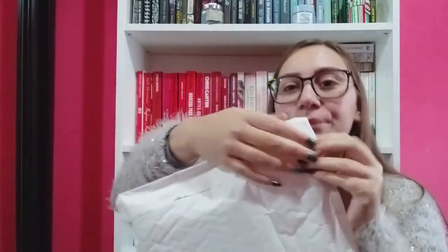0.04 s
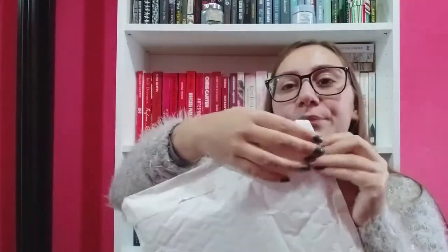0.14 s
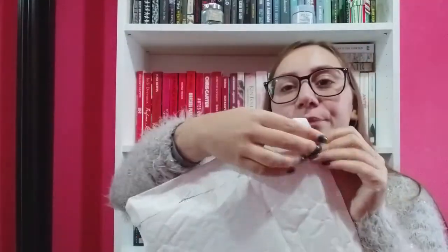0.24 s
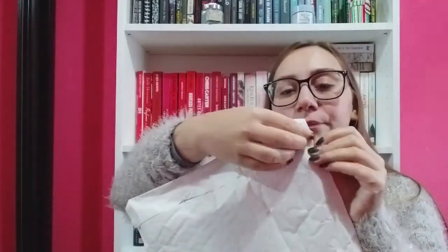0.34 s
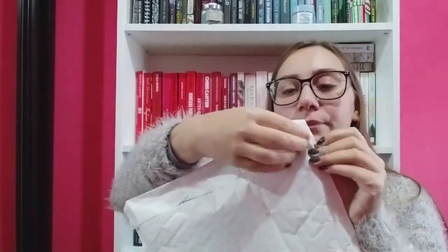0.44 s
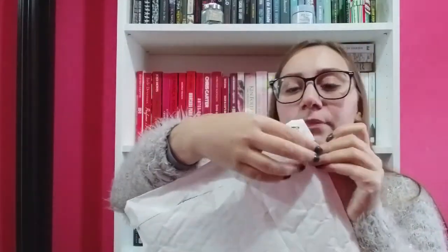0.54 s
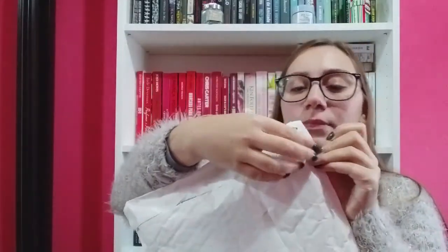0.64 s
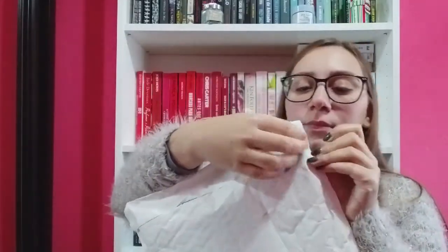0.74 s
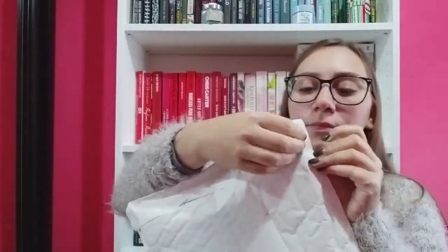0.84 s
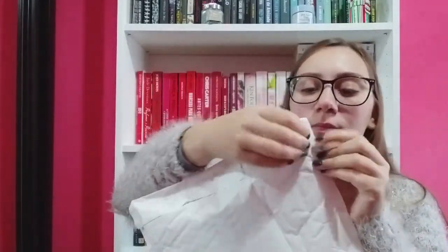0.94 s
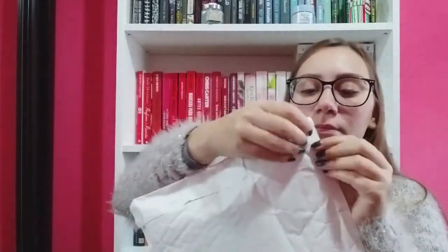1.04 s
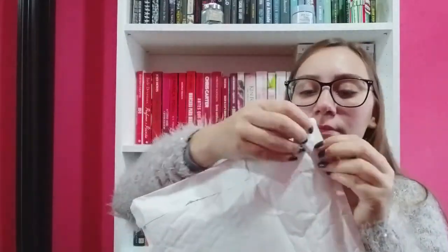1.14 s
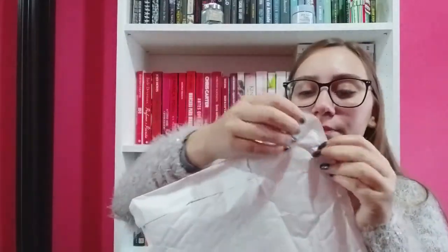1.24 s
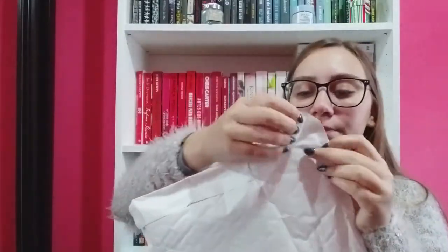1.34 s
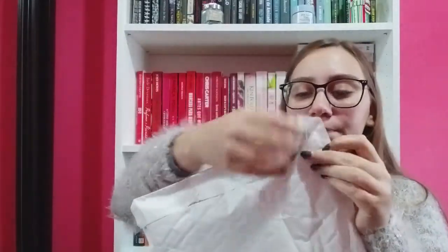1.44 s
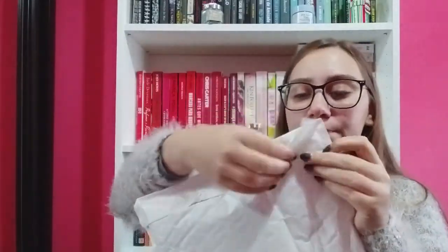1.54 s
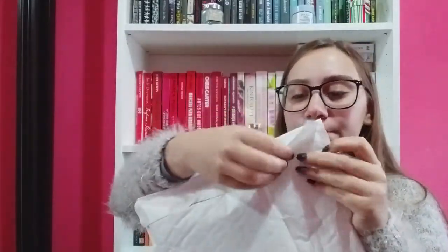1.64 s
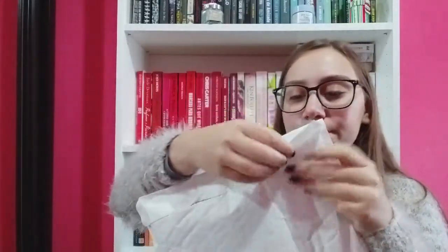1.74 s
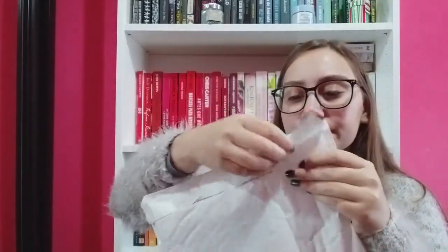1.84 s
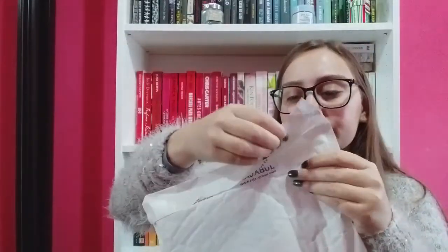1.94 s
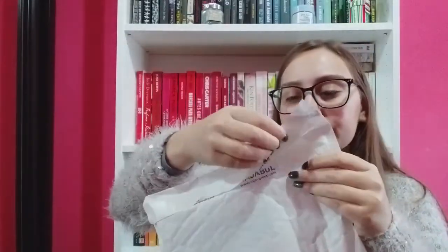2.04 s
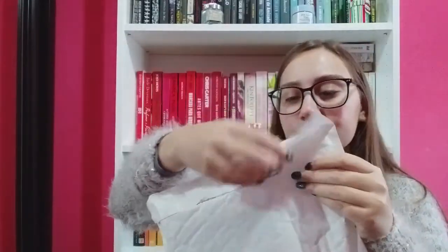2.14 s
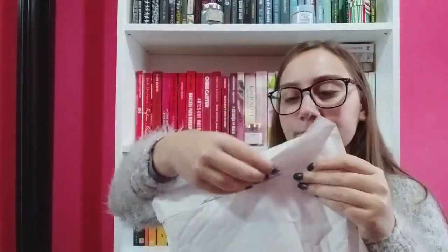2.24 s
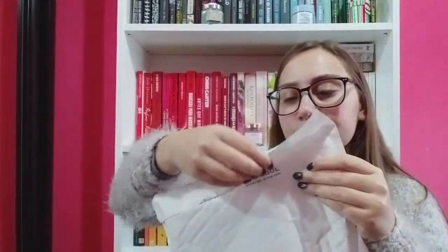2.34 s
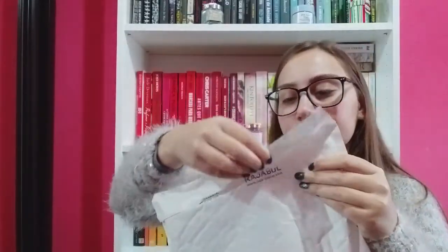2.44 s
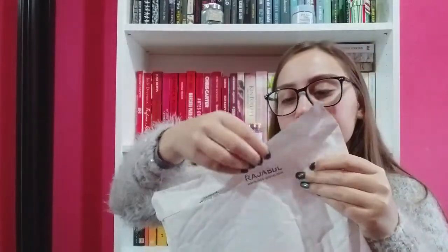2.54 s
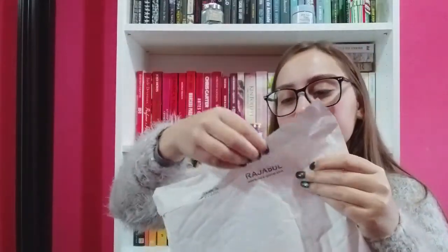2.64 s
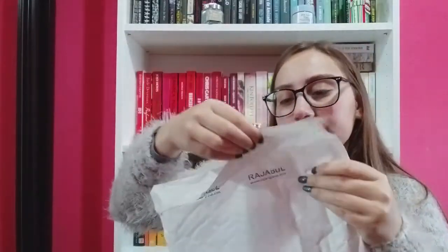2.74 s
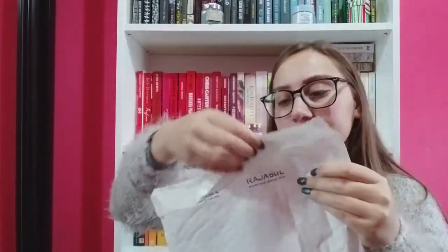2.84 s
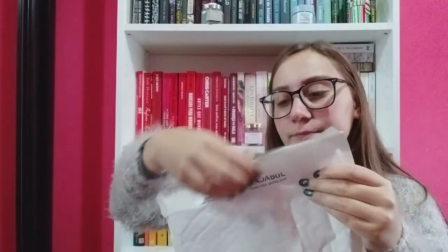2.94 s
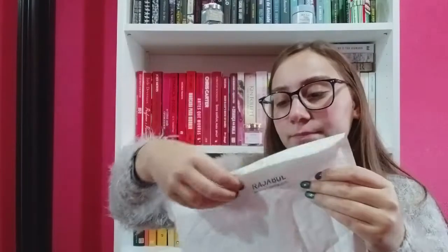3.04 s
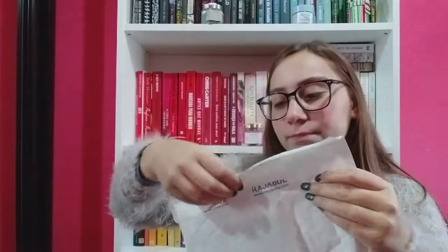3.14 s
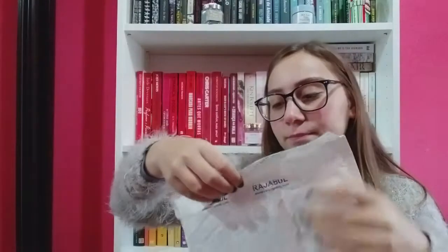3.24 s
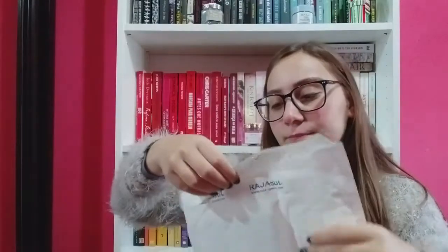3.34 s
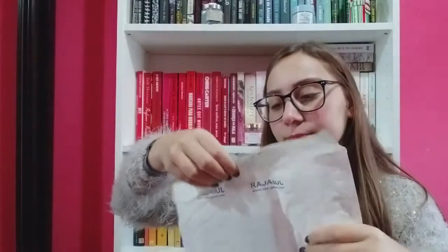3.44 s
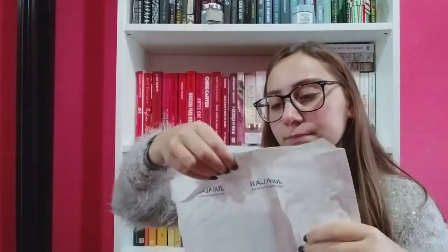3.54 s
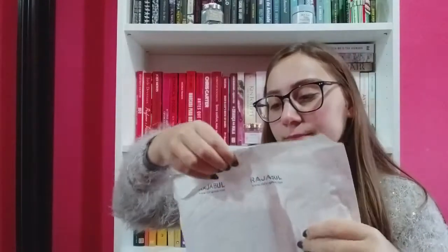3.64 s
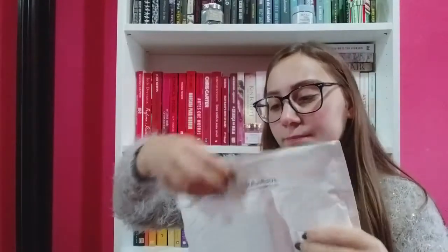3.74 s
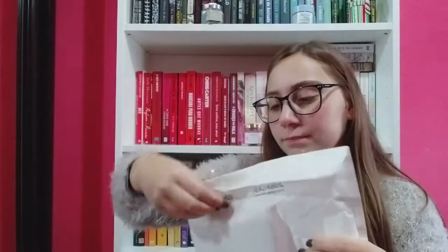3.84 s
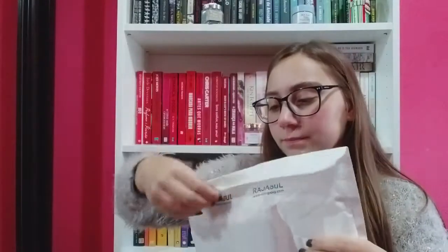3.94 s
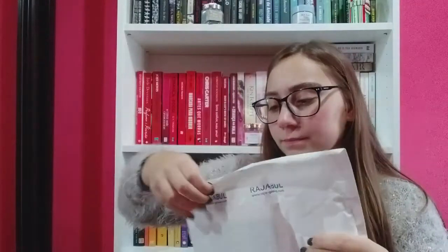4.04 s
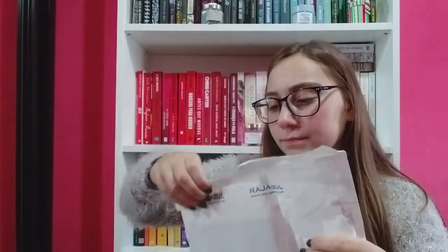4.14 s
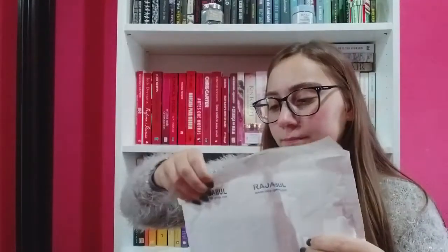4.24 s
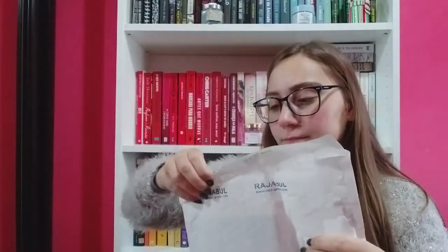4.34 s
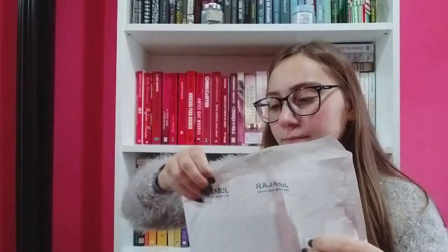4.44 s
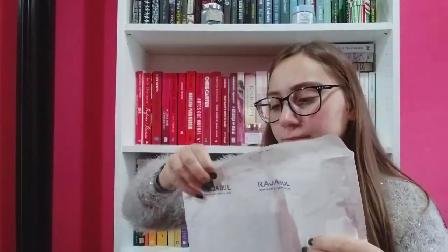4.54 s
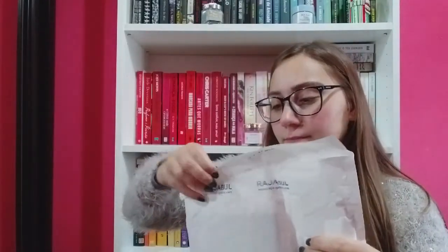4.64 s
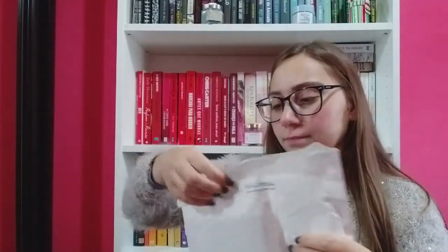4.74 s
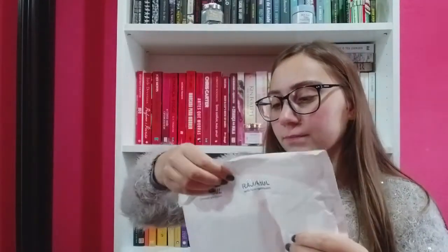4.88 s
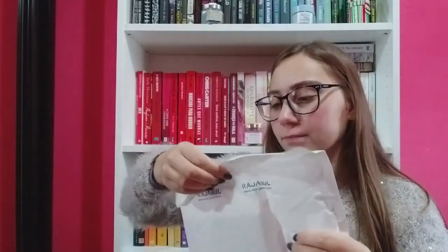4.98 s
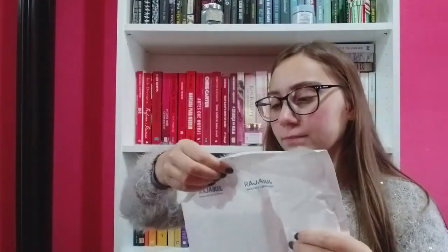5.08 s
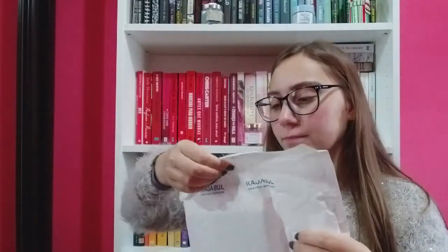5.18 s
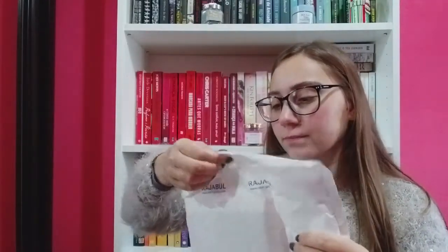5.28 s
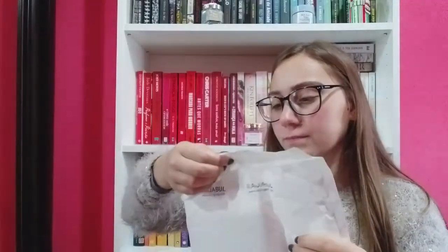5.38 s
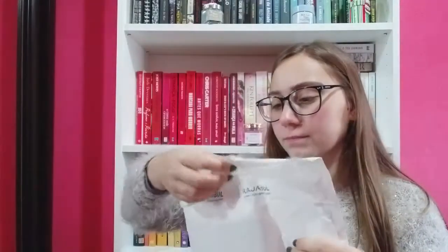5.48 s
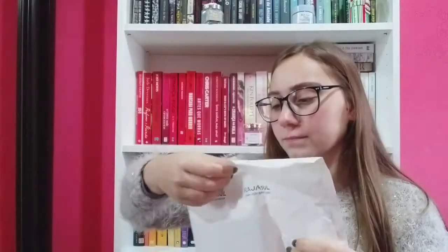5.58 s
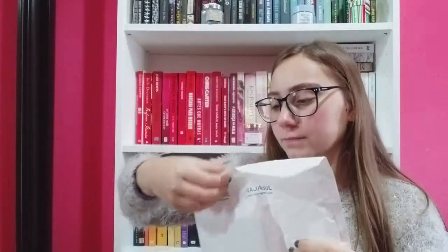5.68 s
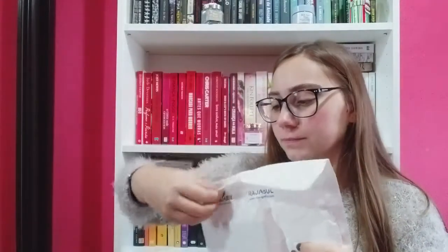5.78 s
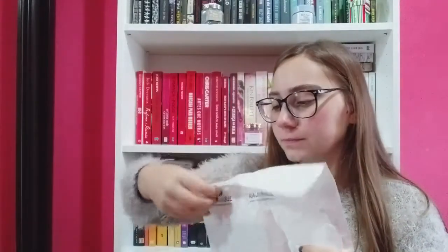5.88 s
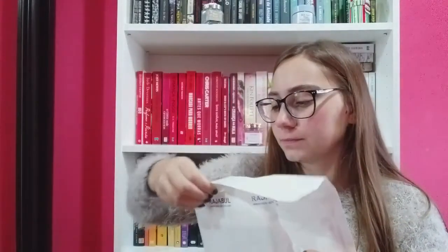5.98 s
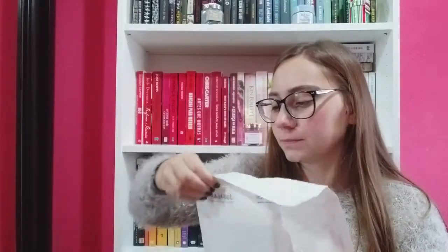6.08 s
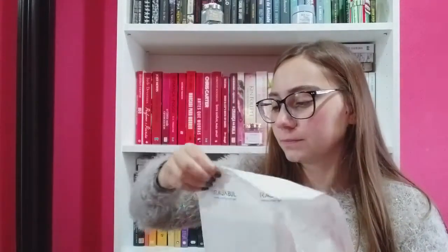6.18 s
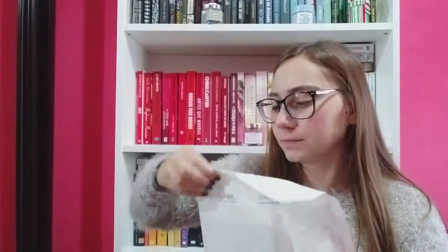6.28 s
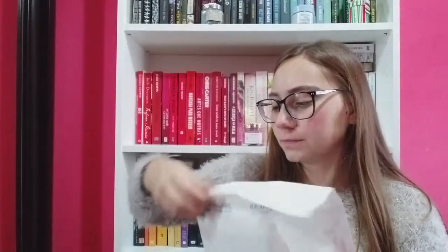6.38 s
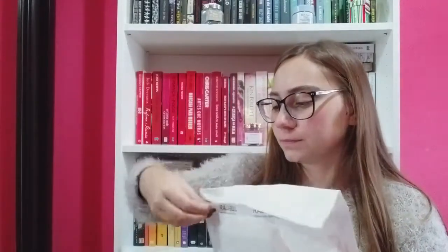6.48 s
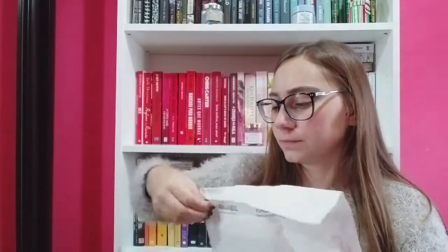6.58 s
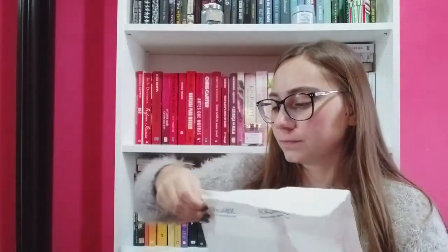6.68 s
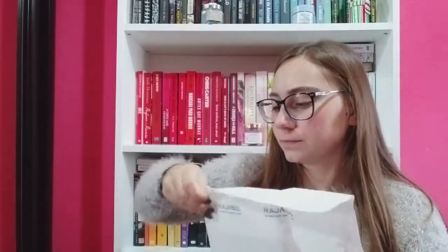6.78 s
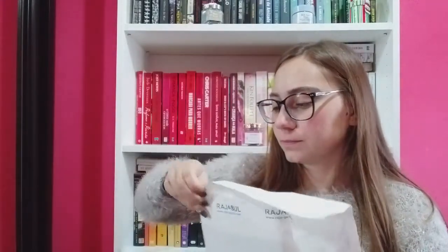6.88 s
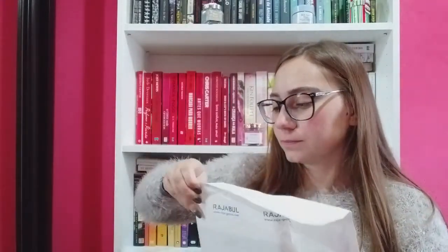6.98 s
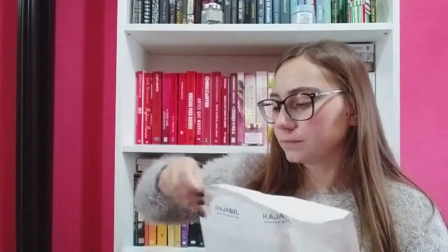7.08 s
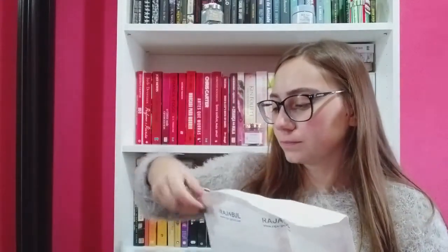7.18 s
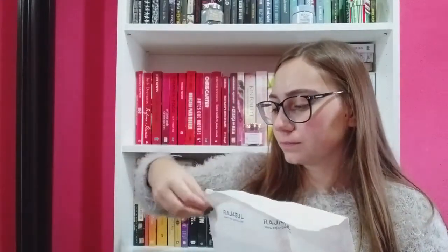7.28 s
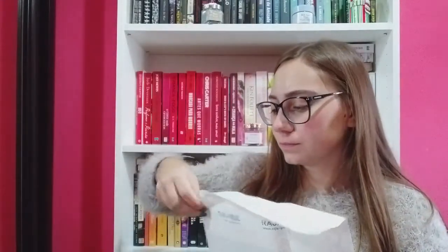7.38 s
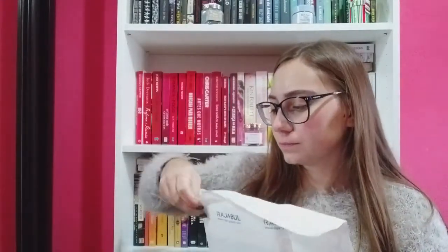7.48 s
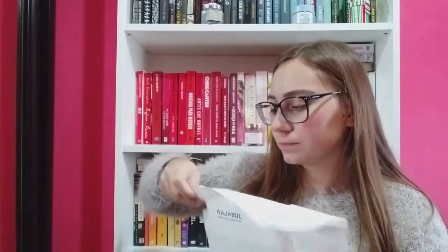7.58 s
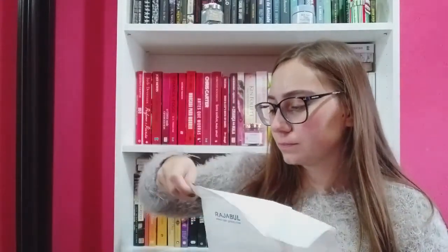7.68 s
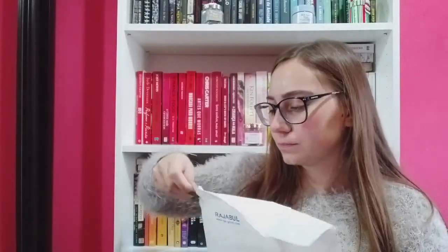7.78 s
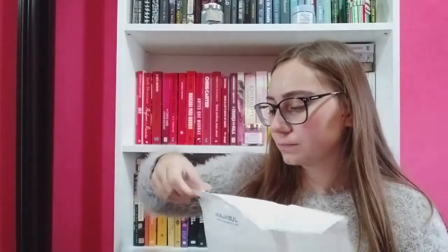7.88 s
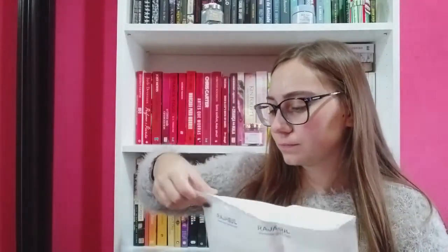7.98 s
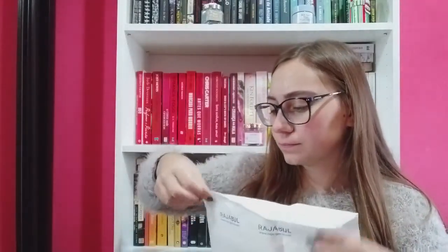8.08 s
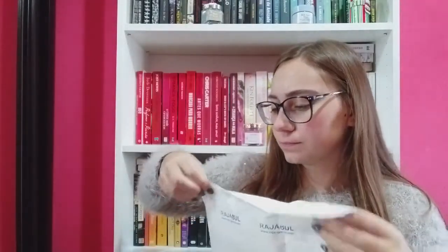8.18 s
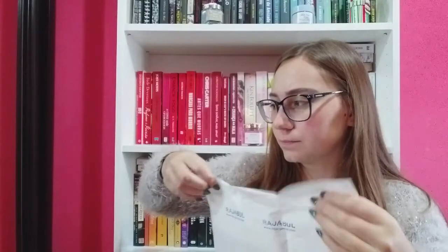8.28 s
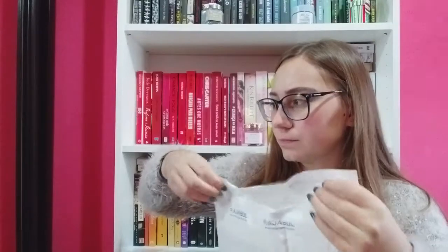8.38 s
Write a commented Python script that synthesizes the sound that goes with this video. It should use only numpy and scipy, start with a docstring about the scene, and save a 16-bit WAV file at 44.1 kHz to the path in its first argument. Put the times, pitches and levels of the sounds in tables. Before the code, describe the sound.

Close, crisp paper crinkles and slides while a glued flap tears in brief rips, with hollow little thumps from the envelope, indoors.

```python
"""A padded paper envelope is pulled open by hand, close to a phone in a small furnished room.
Over a faint steady hush, sheets slide and flex from the start: filtered random slips, swelling by strokes.
Creases soon snap as ringing pulses, and the hollow pouch thumps in short decaying swings and low rumble.
From 1.2 s the glued flap also gives way in short rips of dense fibre noise; the last, at 7.6 s, leaves
sliding, flexing and snapping to the end."""
import sys
import numpy as np
from scipy import signal
from scipy.fft import rfft, irfft
from scipy.io import wavfile

SR = 44100
rng = np.random.default_rng(int(sys.argv[2]) if len(sys.argv) > 2 else 0)


def waveform_to_disk(signal):
    """Save audio, clipped to [-1, 1], as 16-bit WAV at the path in sys.argv[1]."""
    frames = np.transpose(np.atleast_2d(signal))
    scaled = np.clip(frames, -1, 1) * 32767
    samples = np.round(scaled).astype(np.int16)
    wavfile.write(sys.argv[1], SR, samples)


N = 371322
T = np.arange(N) / SR
TOP_HZ = 16100


def undb(db):
    """Decibels to amplitude gain."""
    return 10 ** (np.asarray(db) / 20)


def unit(x):
    """Scale to rms 1."""
    return x / np.sqrt(np.mean(x ** 2))


def band(x, lo_hz, hi_hz, order=2):
    """Causal Butterworth band-pass."""
    edges_hz = [lo_hz, min(hi_hz, SR / 2 - 1)]
    return signal.sosfilt(signal.butter(order, edges_hz, "band", fs=SR, output="sos"), x)


def colour(x, points, size=2048):
    """Minimum-phase filter through (f/Hz, gain/dB) points."""
    hz, db = np.transpose(points)
    grid_hz = np.linspace(1, SR / 2, size // 2 + 1)
    gain_db = np.interp(np.log(grid_hz), np.log(hz), db)
    # folding the cepstrum makes the response causal
    cepstrum = irfft(np.log(undb(gain_db)))
    cepstrum[1:size // 2] *= 2
    cepstrum[size // 2 + 1:] = 0
    response = irfft(np.exp(rfft(cepstrum)))
    return signal.fftconvolve(x, response)[:len(x)]


def ring(x, hz, width_hz):
    """One two-pole resonance, gain 1 at its centre."""
    w = 2 * np.pi * min(hz, SR / 2 - 1) / SR
    a = np.sin(w) * width_hz / hz / 2
    return signal.lfilter([a, 0, -a], [1 + a, -2 * np.cos(w), 1 - a], x)


def walk(rate_hz):
    """Random curve of rms 1: straight lines between knots, rate_hz knots per second."""
    knots = rng.standard_normal(N // 10)
    return unit(np.interp(T * rate_hz, np.arange(len(knots)), knots))


def crackle(rate_hz, spread_db):
    """Tiny slips at random moments, many small and a few large; rms 1."""
    size = undb(spread_db * np.minimum(rng.exponential(size=N), 4.5))
    happens = rng.random(N) < rate_hz / SR
    return unit(happens * size * rng.choice([-1, 1], N))


def add(out, s, x):
    """Mix x in at time s."""
    i = max(int(s * SR), 0)
    out[i:i + len(x)] += x[:max(N - i, 0)]


def gesture(s, hold_s, attack_s, release_s, swell_db=0):
    """Level/dB of one hand movement: builds up, runs on, relaxes; attack and release in s per 20 dB."""
    slack = np.maximum(0, np.maximum((s - T) / attack_s, (T - s - hold_s) / release_s))
    return swell_db * (np.clip((T - s) / hold_s, 0, 1) - .5) - 20 * slack


def hush():
    """Quiet room: steady coloured noise."""
    # room spectrum: f/Hz, gain/dB
    quiet = [(20, -44), (40, -19), (90, -4), (230, -19.5), (450, -24), (1200, -31), (5000, -21),
             (16000, -33)]
    return unit(colour(rng.standard_normal(N), quiet)) * undb(-61.5)


def room(x, first_wall_s=.007, wander_s=0.000307):
    """Shelves and walls scatter a short tail, decaying slightly faster in the lows."""
    t60_low_s, t60_high_s, tail_db = 0.16, 0.18, -9
    t = T[:SR // 2]
    noise = rng.standard_normal(len(t))
    low = band(noise, 80, 900, order=1) * undb(-60 * t / t60_low_s)
    high = band(noise, 900, 13000, order=1) * undb(-60 * t / t60_high_s)
    tail = (low + high) * (t > first_wall_s)
    # the sounding spot wanders over the sheet, so its path to the walls keeps changing
    sent = np.interp(T - wander_s * walk(45), T, x)
    return x + undb(tail_db) * signal.fftconvolve(sent, tail / np.linalg.norm(tail))[:N]


def pouch(x):
    """The hollow envelope lends its broad resonances to whatever shakes it."""
    # pouch resonances: f/Hz, width/Hz, gain/dB
    modes = [(166.2, 21, 5), (338, 13, -6), (455, 94, 1), (577.7, 23, 14.5), (890, 72, 6.5)]
    return x + sum(undb(db) * ring(x, hz, width_hz) for hz, width_hz, db in modes)


def knocks(cycles=2.12, flutter_db=-10):
    """A finger's soft push sets a panel of the pouch swinging for a few uneven cycles."""
    # knocks and buckles: t/s, drive/dB before envelope and output gain, f/Hz
    pushes = [(0.324, -29, 517), (0.971, -28, 452), (0.998, -41.5, 115), (1.473, -31, 440),
              (1.747, -23, 1080), (2.776, -15.5, 493), (2.958, -26, 166), (3.794, -30, 890),
              (3.864, -25.5, 533), (4.074, -30, 457), (4.318, -29, 860), (4.811, -21, 885),
              (4.86, -19, 480), (4.936, -27, 477), (4.972, -20, 875), (5.04, -20, 455), (5.303, -14.5, 910),
              (5.559, -27.5, 810), (5.946, -29, 490), (6.434, -21.5, 520), (7.202, -18, 1020),
              (7.211, -18, 870), (7.224, -18, 900)]
    out, t = np.zeros(N), T[:SR // 10]
    for s, db, hz in pushes:
        flutter = unit(ring(rng.standard_normal(len(t)), hz, hz))
        swing = np.sin(2 * np.pi * hz * t) + undb(flutter_db) * flutter
        envelope = np.exp(-hz * t / cycles) * (1 - np.exp(-2 * hz * t))
        add(out, s, undb(db) * swing * envelope)
    return out * undb(2.0)


def effort():
    """Drive/dB of hiss, flexing, fine treble and rumble: the strongest movement of the moment sets each."""
    # strokes of sheet over sheet: t/s, length/s, hiss/dB, swell over the stroke/dB,
    # flex re hiss/dB, fine treble re hiss/dB (both before output gain)
    strokes = [(0.0, 0.25, -39, -7, -9.5, -11.5), (0.33, 0.042, -43, -3.5, -6.5, -11.5),
               (0.508, 0.072, -48, 3, -12, -10), (0.707, .11, -48.5, 8, -19, -7.5),
               (0.98, .07, -45.5, -4, -12, -6), (1.075, 0.047, -37, -1.5, -12, -6),
               (1.18, .05, -38.5, 1, -23, -12), (1.513, 0.17, -44, -8.5, -5.5, -7),
               (1.744, 0.25, -40, 4, -7.5, -9.5), (2.215, 0.057, -35, 0, -5, -15),
               (2.378, 0.15, -37, 8, -7, -10), (2.6, 0.13, -38.5, 14, -13, -7.5),
               (2.874, .29, -39.5, -2, -2, -11), (3.342, 0.11, -33.5, 5, -6, -12),
               (3.783, 0.1, -32.5, 0.5, -4.5, -13), (4.103, 0.087, -42, 1, -3.5, -14),
               (4.231, 0.14, -40.5, -4.5, -5.5, -10.5), (4.459, .13, -39.5, 3, -8.5, -11),
               (4.733, 0.14, -33.5, -2, -5.5, -13), (4.923, .03, -33, -3, -10, -16),
               (5.045, 0.27, -34.5, 0.5, -11.5, -7), (5.441, 0.13, -37.5, 2.5, -6, -12.5),
               (5.668, 0.2, -36, 3, -8.5, -14), (5.932, .05, -38, 2, -6, -14),
               (6.047, 0.11, -32, 4.5, -9.5, -10.5), (6.379, 0.064, -29, 4.5, -4, -12),
               (6.45, 0.055, -33.5, 0, -4.5, -16), (6.656, 0.12, -37, -3, -8.5, -14),
               (6.916, 0.078, -33.5, 5.5, -5.5, -10), (7.142, 0.069, -31, 0.5, -7, -12.5),
               (7.287, 0.086, -40.5, 1, -3, -15), (7.509, 0.059, -37.5, -7.5, -8, -10),
               (7.743, 0.44, -40.5, 7.5, -2.5, -9.5), (8.125, 0.12, -33, -5.5, -5, -8.5),
               (8.324, 0.092, -38.5, -6, -5, -9)]
    # grips that squeeze the pouch: t/s, rumble/dB before output gain
    grips = [(1.07, -50), (1.51, -46), (2.2, -48.5), (2.96, -44.5), (3.35, -45.5), (3.43, -43), (3.79, -42),
             (3.87, -44), (4.06, -42), (4.72, -43.5), (4.975, -42), (6.2, -42.5), (6.41, -43), (6.99, -46),
             (7.7, -47.5), (8.1, -44), (8.2, -49), (8.35, -51)]
    # held paper never quite rests: only pinched, then being opened
    pinched_db, held_db, opening_s = -56, -49, 0.88
    held_flex_db, held_fine_db, rumble_re_flex_db = -8, -8, -16.5
    # s per 20 dB, except hold
    stroke_attack_s, stroke_release_s = 0.081, 0.15
    grip_attack_s, grip_hold_s, grip_release_s = 0.026, 0.015, 0.074

    hiss = np.where(T < opening_s, pinched_db, held_db)
    flex, fine = hiss + held_flex_db, hiss + held_fine_db
    for s, hold_s, db, swell_db, flex_db, fine_db in strokes:
        stroke = db + gesture(s, hold_s, stroke_attack_s, stroke_release_s, swell_db)
        hiss = np.maximum(hiss, stroke)
        flex = np.maximum(flex, stroke + flex_db)
        fine = np.maximum(fine, stroke + fine_db)
    rumble = flex + rumble_re_flex_db
    for s, db in grips:
        squeeze = db + gesture(s, grip_hold_s, grip_attack_s, grip_release_s)
        rumble = np.maximum(rumble, squeeze)
    return hiss, flex, fine, rumble


def wrinkles(rate_hz=28, count=10):
    """Small wrinkles of many sizes pop at random, each size with a brief pitch of its own."""
    pitches_hz = np.geomspace(450, 2800, count)
    return unit(sum(ring(crackle(rate_hz, spread_db=5), hz, .5 * hz) / np.sqrt(hz) for hz in pitches_hz))


def handling(hiss_db, flex_db, fine_db, rumble_db):
    """Fibres catch and slip as the sheets slide; the sheet and the pouch flex in coarser steps."""
    # sliding-paper spectrum: f/Hz, gain/dB
    slide = [(29, -50), (50, -37), (106, -13.5), (163, -15.5), (264, -14), (461, 2.5), (694, -17.5),
             (884, -1.5), (1120, -0.5), (1740, -6), (5020, 3), (7760, -5), (8970, -18), (10900, -17.5),
             (16000, -19.5)]
    # the slips come in little flurries
    grains = crackle(rate_hz=2200, spread_db=3.5) + undb(-0.5) * rng.standard_normal(N)
    slips = colour(grains, slide) * undb(walk(110))
    steps = pouch(colour(crackle(rate_hz=400, spread_db=5.5), slide))
    # now and then a single fibre or thread of glue parts with a bright tick
    ticks = unit(band(crackle(rate_hz=55, spread_db=4), 2900, 19000, order=1))
    ticks = ticks * undb((hiss_db + fine_db) / 2 - 5)
    # the contact wanders over the paper, so each register swells on its own
    hiss_low = band(slips, 1170, 2600) * undb(2 * walk(35))
    hiss_high = band(slips, 3920, 8960, order=3) * undb(2 * walk(30))
    hiss = unit(hiss_low + hiss_high)
    fine = unit(band(slips, 9360, 15650, order=3))
    give = undb(2.4 * walk(40))
    bending = unit(band(steps + pouch(slips), 360, 2260))
    flex = unit((bending + wrinkles()) * give)
    rumble = unit(band(steps, 86, 223, order=3) * undb(3.6 * walk(30)))
    sliding = hiss * undb(hiss_db) + fine * undb(fine_db + 5.5)
    flexing = flex * undb(flex_db) + rumble * undb(rumble_db + 0.5)
    return sliding + flexing + ticks


def small_snaps(hiss_db, count=300):
    """Small creases at random moments and pitches, stronger the harder the paper slides."""
    rate_hz, above_hiss_db, spread_db, centre_hz, crinkle_db = 22, 11, 3, 2800, 1
    chance, size = rng.random((count, 3)), rng.standard_normal(count)
    rows = []
    for (when, facet, luck), z in zip(chance, size):
        if luck < rate_hz * T[-1] / count:
            db = hiss_db[int(when * N)] + above_hiss_db + spread_db * z
            rows.append((when * T[-1], db, centre_hz * 2 ** (2 * facet - 1), crinkle_db))
    return rows


def snaps(creases, damping=2.03, crinkle_s=0.0044, settle_s=0.009, settle_db=-12, yield_db=-23,
          facet_db=-3, facet_width=0.078):
    """Fibres yield, a facet flips with one sharp pulse, and the paper around it crinkles and settles."""
    # snapping-crease spectrum: f/Hz, gain/dB
    radiation = [(100, -10.5), (500, 0.5), (6500, 2.5), (9000, -5.5), (16000, -5)]
    out, lead = np.zeros(N), SR // 50
    t = T[:SR // 8] - T[lead]
    pulse = (t == 0) * 1.
    before = undb(yield_db) * np.exp(-abs(t) / crinkle_s)
    after = np.exp(-abs(t) / crinkle_s) + undb(settle_db) * np.exp(-abs(t) / settle_s)
    for s, db, hz, crinkle_db in creases:
        grains = rng.standard_normal(len(t)) * undb(5.0 * rng.standard_normal(len(t)))
        crinkle = grains * np.where(t < 0, before, after)
        push = pulse + undb(crinkle_db) * crinkle / np.linalg.norm(crinkle)
        # every facet has its own size, hence a few short rings of its own
        facets_hz = hz * 2 ** rng.uniform(-1.02, 1, size=3)
        push = push + undb(facet_db) * sum(ring(push, f, facet_width * f) for f in facets_hz)
        pulse_peak = ring(pulse, hz, damping * hz).max()
        add(out, s - T[lead], undb(db) * ring(push, hz, damping * hz) / pulse_peak)
    return colour(out, radiation) * undb(1.18)


def rips():
    """The flap gives way: thousands of fibres break each second and shake the sheet."""
    # pulls on the flap: t/s, length/s, rise/(s per 20 dB), fibres/dB before output gain, shake re fibres/dB
    pulls = [(1.249, 0.059, 0.1159, -28.5, -13), (1.94, 0.059, 0.1547, -24.5, -12),
             (2.715, 0.061, 0.0131, -18.5, -10), (3.537, 0.022, 0.17, -29, -13.5),
             (4.047, 0.01, 0.04, -24, -11), (5.303, 0.02, 0.094, -20, -7.5), (6.176, .036, 0.02, -24, -14),
             (6.873, 0.023, 0.09, -25, -17), (7.639, 0.04, 0.06, -20.5, -12)]
    # tearing-paper spectrum: f/Hz, gain/dB
    tear = [(35, -77), (60, -7), (149, -7), (448, 2), (651, -8), (882, 5.5), (1060, 0), (1660, 0),
            (5090, 0), (7570, -1.5), (9130, -8), (10800, -4), (16000, -7.5)]
    release_s = 0.049  # per 20 dB
    breaks = crackle(rate_hz=7000, spread_db=5.0) + undb(-2) * rng.standard_normal(N)
    fibres = colour(breaks, tear) * undb(3.1 * walk(220))
    bright = unit(band(fibres, 960, TOP_HZ))
    shake = unit(band(pouch(fibres), 71, 730))
    out = np.zeros(N)
    for s, hold_s, rise_s, db, shake_db in pulls:
        # tension builds, the seam runs at full speed, then the pull relaxes
        pull_db = gesture(s, hold_s, rise_s, release_s)
        now = pull_db > -80
        out[now] += undb(db + pull_db[now]) * (bright[now] + undb(shake_db) * shake[now])
    return out * undb(1.65)


def scene():
    """The envelope in the room, over a faint steady hush."""
    # larger creases: t/s, pulse drive/dB before colouring, facet f/Hz, crinkle re pulse/dB
    large_creases = [(0.195, -17.5, 2580, 3), (0.365, -25, 1990, 3), (0.812, -23, 2920, 8.5),
                     (0.889, -34.5, 1210, 11), (0.97, -18, 2700, 5), (1.408, -25.5, 1500, 8.5),
                     (1.477, -27, 2000, 6), (1.51, -21, 920, 5.5), (1.643, -17, 3600, 9),
                     (1.746, -20.5, 1280, 8), (1.805, -23.5, 1240, 7), (1.853, -15.5, 999, 4),
                     (1.961, -9, 3950, 7), (2.006, -13, 2230, 7.5), (2.098, -28, 1470, 4),
                     (2.15, -24.5, 2200, 10), (2.245, -9.5, 4840, 5), (2.389, -15.5, 1720, -2),
                     (2.526, -7.5, 4600, 0), (2.7175, -12, 2910, 3), (2.754, -3, 5200, 5.5),
                     (2.784, 2, 8500, -13), (2.9226, -7, 5940, 5), (3.131, -14.5, 2090, 2.5),
                     (3.149, -16, 1280, -2), (3.438, -10.5, 4660, 1.5), (3.534, -8, 3820, 4.5),
                     (3.6345, -14, 1680, 6.5), (4.0438, 1, 4200, -4), (4.055, -8.5, 3500, -3),
                     (4.074, -8.5, 1600, 3), (4.347, -13.5, 10100, -3), (4.565, -5.5, 2300, 1.5),
                     (4.732, -13, 4930, 2), (4.847, -14, 1760, 6.5), (4.855, -13, 940, 4),
                     (4.937, -18, 1810, 6.5), (4.971, -15.5, 1300, 3), (5.043, -11.5, 6450, 1),
                     (5.2152, -5, 6240, 2.5), (5.261, -13.5, 6000, -5), (5.3048, 4, 8500, 0),
                     (5.691, -12, 7450, 0), (5.754, -11.5, 3200, 0), (5.764, -10, 4070, -1),
                     (5.8585, -12, 3000, 1.5), (5.947, -19.5, 1720, 6.5), (5.962, -15, 2800, 4.5),
                     (6.172, -8, 5070, 4), (6.1935, -4, 4630, 3), (6.419, -16, 1610, 8),
                     (6.685, -20.5, 1440, 5), (6.776, -15.5, 2900, 8.5), (6.8568, -3, 2600, 0),
                     (7.353, -11, 2070, 6.5), (7.6317, -2.5, 1940, 4.5), (7.814, -21, 1390, 5),
                     (7.867, -18.5, 2560, 7.5), (8.134, -4, 2370, 2), (8.313, -15.5, 1210, 4.5)]
    background = hush()
    hiss_db, flex_db, fine_db, rumble_db = effort()
    paper = handling(hiss_db, flex_db, fine_db, rumble_db) + rips() + knocks()
    paper = paper + snaps(list(large_creases) + small_snaps(hiss_db))
    return (room(paper) * undb(-0.51) + background)[None]


def record(dry):
    """The phone's microphone dips near 9 kHz, clips at full scale and cuts the top."""
    # microphone response: f/Hz, gain/dB
    mic = [(25, -12), (55, 0.5), (100, 3.5), (5000, 0), (7400, 0.5), (8200, -1.5), (8900, -6), (9600, -5),
           (11000, -3), (16000, -4.5)]
    heard = np.clip(colour(dry[0], mic), -1, 1)
    return signal.sosfilt(signal.ellip(10, .2, 70, TOP_HZ, fs=SR, output="sos"), heard)[None]


dry = scene()
out = record(dry)
waveform_to_disk(out)
```